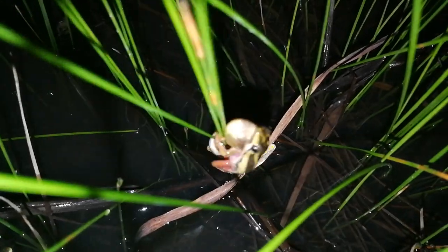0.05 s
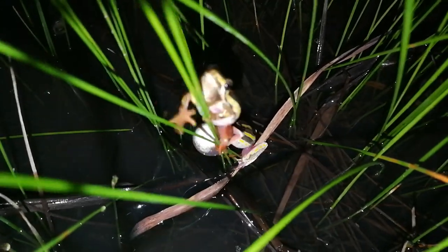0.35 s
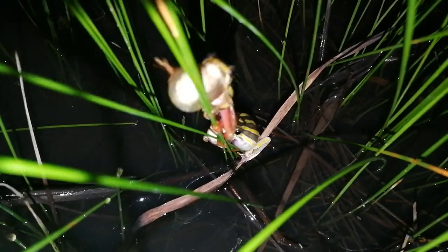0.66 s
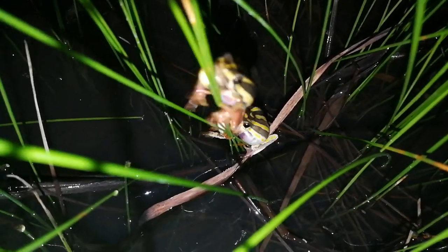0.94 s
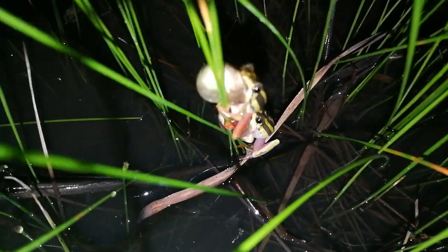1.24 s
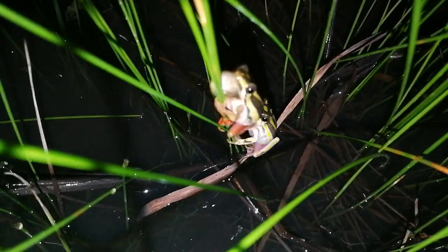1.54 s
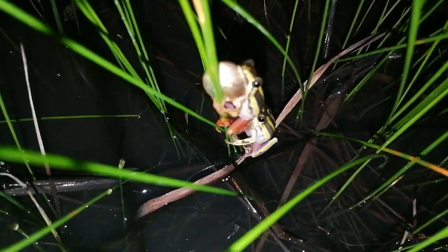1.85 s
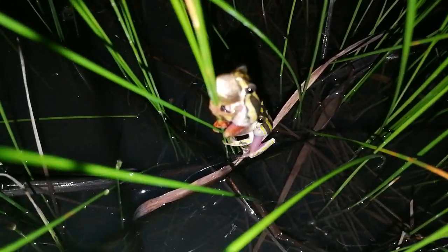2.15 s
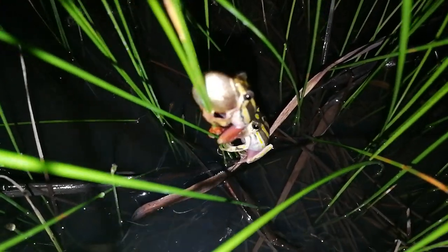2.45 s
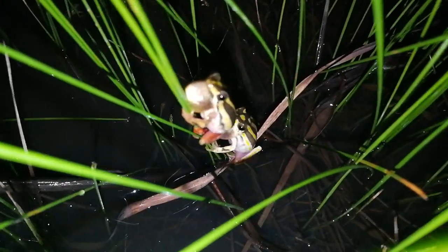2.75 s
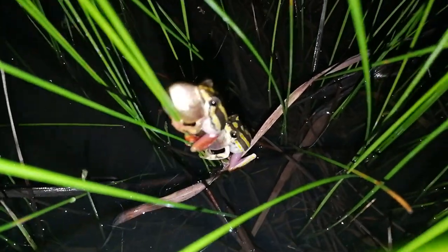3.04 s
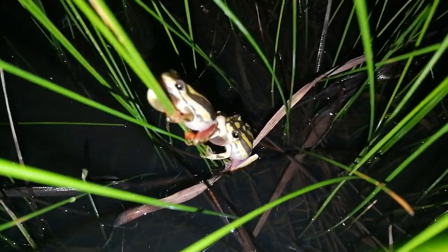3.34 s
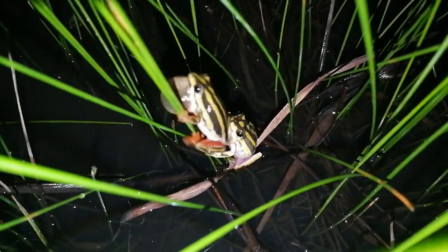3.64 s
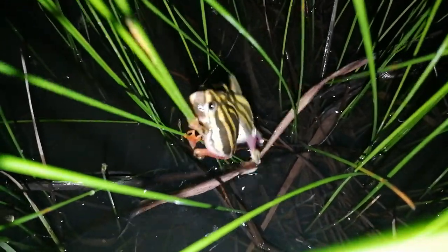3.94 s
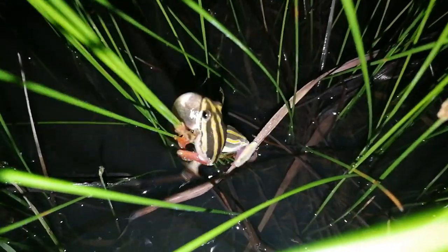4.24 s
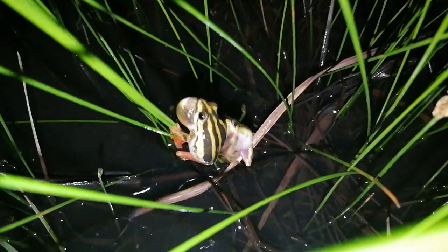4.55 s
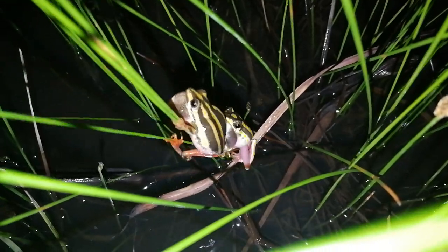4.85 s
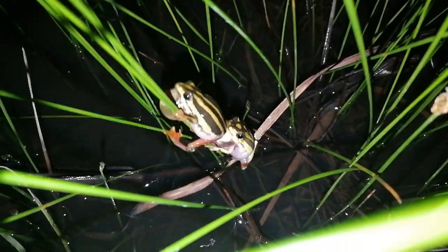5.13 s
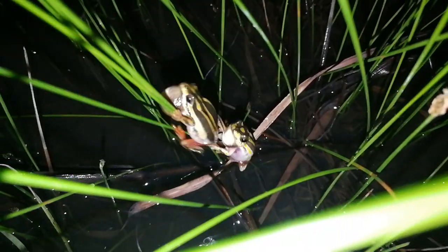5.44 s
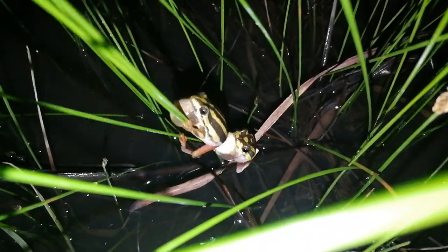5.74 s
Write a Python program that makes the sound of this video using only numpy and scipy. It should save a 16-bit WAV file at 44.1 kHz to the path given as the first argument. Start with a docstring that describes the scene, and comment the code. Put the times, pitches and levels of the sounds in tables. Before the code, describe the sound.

Two reed frogs call loudly at a night pond, about an arm's length away and slightly to the right. Each call is a shrill, raspy chirp about a quarter of a second long that rises in pitch and ends in a tiny rattle. The slightly deeper, rougher frog calls at 0.1, 1.9, 4.8 and 5.7 seconds, the higher one at 0.5, 1.6, 2.3, 3.6, 5.1 and 5.8. They overlap around 1.1, 3.0 and 4.2 seconds.

Smaller frogs make quick runs of sharp, high clicks on both sides. These are faint at first, clear at about 2.1 and 2.6 seconds, then loud and frequent from 3.4 seconds to the end. Throughout, a quiet distant frog chorus blends with very faint cricket trills and a soft low rumble of air. Far-off clicking swells in gentle waves, and faint distant calls come near 0.8 and 3.9 seconds.

```python
"""Two male reed frogs squabble on a stem over a pond at night, an arm's length away, trading short calls.
Each call is a train of pulses from the voice box that rings the vocal sac; the sac tightens, so the
pitch rises. Smaller frogs click among the reeds. Behind them a far chorus, crickets and a faint
trill carry on, and the air rumbles softly."""
import sys
import numpy as np
from scipy import signal
from scipy.fft import rfft, irfft, next_fast_len
from scipy.io import wavfile
from scipy.ndimage import uniform_filter1d

SR = 44100
rng = np.random.default_rng(int(sys.argv[2]) if len(sys.argv) > 2 else 0)


def put_to_file(sound):
    """Save the sound as 16-bit audio at rate SR, in the file named by the first command-line argument."""
    columns = np.atleast_2d(sound).T  # one column per channel
    safe = np.clip(columns, -1, 1)
    whole_steps = np.round(safe * 32767)
    wavfile.write(sys.argv[1], SR, whole_steps.astype(np.int16))


N = 259749
TIME = np.arange(N) / SR

# Tone colour of the rumbling air and of the far chorus: pitch_hz, gain_db
RUMBLE_COLOUR = [(12, -34), (20, -4), (76, 3.5), (184, -5), (338, -21.5), (420, -34.5), (550, -46.5),
                 (920, -120)]
CHORUS_COLOUR = [(300, -31.5), (1000, -31), (1500, -30), (1900, -21.5), (2300, 4), (2800, -17.5),
                 (3500, -26), (5600, -36), (6500, -28), (7600, -31.5), (9000, -36), (11000, -44.5),
                 (15000, -52.5)]
# How the rumble swells and fades: time_s, level_db
RUMBLE_LEVELS = [(0.0, -60.5), (0.92, -51), (1.15, -58.5), (2.15, -66.5), (2.85, -59), (3.17, -67),
                 (3.46, -57), (4.25, -61), (5.51, -55), (5.89, -62)]
# When the faint trill sounds: start_s, end_s
TRILL_TIMES = [(.68, .875), (2.57, 2.8), (4.48, 4.72)]
# Waves of far clicking: crest_s, level_db
CLICK_WAVES = [(0.97, -53.5), (1.9, -51.5), (2.75, -49), (3.6, -44.5), (4.15, -50), (5.0, -43), (5.35, -59),
               (5.87, -42.5)]
# Reed frogs farther off: start_s, length_s, first_hz, last_hz, level_db
FAR_CALLS = [(0.75, 0.094, 2370, 3000, -44.5), (0.827, 0.24, 2590, 3050, -66),
             (3.889, 0.061, 2370, 2870, -44.5), (3.929, 0.068, 2550, 2700, -48.5)]
# Runs of single and of double clicks (pan_db is how much louder the left side is):
# pitch_hz, pan_db, first_db, last_db, click_times_s
SINGLE_CLICK_RUNS = [(4115, 12, -39, -39, (0.919, 0.9622)), (4150, -4, -21, -19, (2.0966, 2.1779, 2.2379)),
                     (4080, 11, -24.5, -24.5, (2.2514,)),
                     (4050, 6, -39, -37, (2.5456, 2.6768, 2.7437, 2.7949)),
                     (4155, -8, -17.5, -16, (3.474, 3.5358, 3.6098, 3.681)),
                     (4100, 5.5, -40, -38, (4.545, 4.6087)),
                     (4135, -5.5, -16, -18.5, (4.6851, 4.7528, 4.827, 4.9014, 4.9731, 5.0277)),
                     (4105, -4, -17.5, -18, (5.7512, 5.8192))]
DOUBLE_CLICK_RUNS = [(4500, 4, -43, -34, (1.5609, 1.6202)), (4330, 11, -20, -18.5, (2.5805, 2.6311)),
                     (4375, 7.5, -33, -32, (2.8614, 2.9266)),
                     (4485, 6, -15.5, -17, (3.4056, 3.4594, 3.5179)),
                     (4440, 6.5, -35.5, -15.5, (3.917, 3.9781, 4.0434, 4.1131, 4.2624, 4.3211, 4.3849, 4.4437)),
                     (4465, 9, -17.5, -14.5, (5.223, 5.2858, 5.3479, 5.4144, 5.4727)),
                     (4650, -3, -32, -27.5, (5.1936, 5.4455, 5.517))]
# How the two males' sound reaches the left and right sides: pitch_hz, pan_db, left_lead_radians
NEAR_PATH = [(500, 7.5, 1.5), (1480, 6.5, 0.5), (1716, -3, 0.33), (1901, 2.5, 2), (1977, -8, -0.3),
             (2340, -7.5, -2.25), (2423, -4, 2.14), (2430, -17, -1.5), (2710, -10, -2), (2980, -9.5, -1.67),
             (3270, -3.5, -2), (5580, -4, -5.5), (7240, -2.5, -4), (8360, 5.5, -2), (14000, 7, -1)]
# Tone colour of each male's rasp: pitch_hz, gain_db
DEEP_RASP = [(300, -12), (800, -13.5), (1400, -0.5), (3000, -6.5), (4300, -1.5), (5500, 5), (7500, -1),
             (9300, 3.5), (10200, -9.5), (11300, -35.5), (13700, -16), (15500, -35.5)]
HIGH_RASP = [(300, -15), (700, -13.5), (1400, -3), (3300, 12.5), (4300, 0.5), (6000, 7.5), (8000, 2.5),
             (10300, 0), (11100, -12), (12000, -32), (13500, -14), (15500, -39.5)]
# Calls of the deeper and the higher male (steepest_at and roughness run from 0 to 1):
# start_s, length_s, attack_s, rattle_s, pulses_per_s, first_hz, last_hz, steepest_at,
# ring_hz, voice_db, swell_db, rasp_db, roughness
DEEP_CALLS = [(0.085, 0.268, 0.0071, 0.11, 366, 2101, 2801, 0.34, 8450, -18.5, 6.5, -47.5, 0.27),
              (1.1, 0.31, 0.0026, 0.059, 380, 2150, 2683, 0.5, 8700, -21, 6.5, -44, 0.3),
              (1.942, 0.22, 0.0021, 0.07, 340, 2214, 2734, 0.38, 8400, -17, 3.5, -42, 0.29),
              (2.987, 0.21, 0.004, 0.063, 298, 2195, 2780, 0.35, 9230, -18.5, 4, -42.5, 0.22),
              (4.18, 0.234, 0.013, 0.064, 290, 2199, 2334, 0.55, 9300, -21.5, -3, -45.5, 0.24),
              (4.757, 0.22, 0.058, 0.021, 293, 2093, 2862, 0.88, 10150, -19.5, 1, -44.5, 0.12),
              (5.688, 0.21, 0.045, 0.02, 214, 2071, 2270, 0.29, 6400, -20.5, 2, -42.5, 0.15)]
HIGH_CALLS = [(0.518, 0.205, 0.015, 0.035, 472, 2389, 2985, 0.25, 9400, -19.5, 3, -40.5, 0.08),
              (1.083, 0.207, 0.016, 0.03, 504.4, 2407, 2976, 0.43, 9250, -19.5, 2.5, -45, 0.1),
              (1.628, 0.21, 0.043, 0.066, 500.5, 2290, 2853, 0.29, 9740, -17, 2.5, -42.5, 0.049),
              (2.25, 0.21, 0.055, 0.041, 440.2, 2470, 2898, 0.52, 10200, -18.5, 3, -43.5, 0.067),
              (2.927, 0.21, 0.083, 0.038, 399.7, 2366, 2873, 0.47, 9500, -21.5, 0.5, -40.5, 0.092),
              (3.592, 0.18, 0.027, 0.045, 589, 2240, 2950, 0.27, 8800, -20, 2.5, -38.5, 0.14),
              (4.18, 0.2, 0.025, 0.041, 492.6, 2321, 2946, 0.46, 9800, -20.5, 2, -42.5, 0.1),
              (5.113, 0.085, 0.0087, 0.1, 454, 2285, 2456, 0.45, 8800, -19, -3, -46.5, 0.061),
              (5.165, 0.12, 0.072, 0.023, 369.7, 2397, 2680, 0.57, 10200, -18.5, 1.5, -41.5, 0.2),
              (5.795, 0.13, 0.0084, 0.02, 449.5, 2340, 2645, 0.14, 9300, -19, 0, -46, 0.13)]
# The deeper male's sac goes slack once in mid call: time_s, pitch_share, gain_db
SLACK_SAC = [(4.343, 1, 4), (4.358, 0.79, 0.5), (4.38, 0.49, -12), (4.395, 0.715, -10), (4.44, 0.78, -6)]

# How each male shapes all his calls
DEEP_HABIT = dict(rise_width=0.17, rate_sag=0.25, last_rate=88, attack_db=7, release_db=12,
                  best_hz=2550, best_width_hz=93, rattle_bend=0.8, release_bend=3.6,
                  onset_hz=0, onset_rough=0.06, onset_rasp_db=3.5, onset_slowing=0)
HIGH_HABIT = dict(rise_width=0.17, rate_sag=0.28, last_rate=110, attack_db=11, release_db=22,
                  best_hz=2750, best_width_hz=234, rattle_bend=1.5, release_bend=2.45,
                  onset_hz=193, onset_rough=0.38, onset_rasp_db=6, onset_slowing=0.35)


def from_db(db):
    """Turns decibels into a number to multiply by."""
    return 10 ** (np.asarray(db) / 20)


def rms_one(x):
    """Scales a sound to an average power of 1."""
    return x / np.sqrt(np.mean(x ** 2) + 1e-20)


def panned(x, pan_db):
    """Makes the left side pan_db louder than the right."""
    gains = from_db([[pan_db / 2], [-pan_db / 2]])
    return x * gains / gains.mean()


def on_bins(points, size):
    """Reads a table's columns at every frequency of an FFT."""
    hz, *columns = np.transpose(points)
    log_hz = np.log(np.arange(size // 2 + 1) * SR / size + 1)
    return [np.interp(log_hz, np.log(hz), column) for column in columns]


def coloured(x, colour):
    """Gives a sound a tone colour, with no ringing ahead of it (a minimum-phase filter)."""
    size = 2 * next_fast_len(x.shape[-1] // 2 + 1024)
    cepstrum = irfft(np.log(from_db(on_bins(colour, size)[0])))
    cepstrum[1:size // 2] *= 2
    cepstrum[size // 2 + 1:] = 0
    return irfft(rfft(x, size) * np.exp(rfft(cepstrum)))[..., :x.shape[-1]]


def band(x, low_hz, high_hz, order=2):
    """Keeps what lies between two pitches."""
    sections = signal.butter(order, [low_hz, high_hz], "band", fs=SR, output="sos")
    return signal.sosfilt(sections, x + 1e-18)


def drift(per_s):
    """A random wander, about 1 in size."""
    knots = rng.standard_normal(4096)
    return np.interp(TIME * per_s, np.arange(len(knots)), knots)


def resonance(x, hz, width_hz):
    """Rings at a pitch that may move; a narrower width rings longer."""
    turn = np.exp(2j * np.pi * np.cumsum(hz + np.zeros(x.shape[-1])) / SR)
    decay = np.exp(-np.pi * width_hz / SR)
    return 2 * np.real(turn * signal.lfilter([1 - decay], [1, -decay], x / turn + 1e-18))


def evened(x, size=620):
    """Holds the power near 1 over a few pulses, leaving each pulse its shape."""
    power = np.mean(x ** 2, axis=0)
    slow = uniform_filter1d(uniform_filter1d(power, size), size)
    return x / np.sqrt(np.abs(slow) + power.mean() / 100 + 1e-20)


def air_rumble():
    """Low noise that swells and fades, nearly the same on both sides."""
    middle, side = rms_one(coloured(rng.standard_normal((2, N)), RUMBLE_COLOUR))
    level_db = np.interp(TIME, *np.transpose(RUMBLE_LEVELS)) + 2 * drift(7)
    spread = from_db(-11.5) * band(side, 130, 500, order=1) * [[1], [-1]]
    return from_db(level_db) * (middle + spread)


def far_chorus():
    """Many far calls blend into one flickering band of noise."""
    level_db = -49 + 0.52 * drift(37)
    return from_db(level_db) * rms_one(coloured(rng.standard_normal((2, N)), CHORUS_COLOUR))


def far_clicks(per_s=260, width_hz=170, rise_db_per_s=85, fall_db_per_s=40.5, lull_db=-71.5):
    """Far clicking frogs set each other off in waves that build quickly and ebb slowly."""
    waves = [db - np.maximum(rise_db_per_s * (crest_s - TIME), fall_db_per_s * (TIME - crest_s))
             for crest_s, db in CLICK_WAVES]
    level_db = np.maximum(np.max(waves, axis=0), lull_db) + 1.3 * drift(40)
    out = np.zeros((2, N))
    for hz in np.linspace(4080, 4560, num=6):
        clicks = (rng.random((2, N)) < per_s / SR) * rng.standard_normal((2, N))
        out += band(clicks, hz - width_hz / 2, hz + width_hz / 2, order=3)
    return from_db(level_db) * rms_one(out)


def trill(hz, sweep_hz, per_s, sharpness, blur):
    """Short, quickly repeated tones, each sliding down, blurred by the distance."""
    beat = (per_s * TIME + 0.092 * drift(9.3)) % 1
    throb = np.abs(np.sin(np.pi * beat)) ** sharpness
    pitch_hz = hz + sweep_hz * (.5 - beat) + 60 * drift(220)
    tone = np.sin(2 * np.pi * np.cumsum(pitch_hz) / SR)
    scatter = rms_one(band(rng.standard_normal((2, N)), hz - 150, hz + 150))
    return rms_one(throb * (tone + blur * scatter))


def crickets():
    """One high trill never stops; a lower one joins in three times."""
    high = trill(6953, sweep_hz=150, per_s=64, sharpness=2.5, blur=1.0)
    low = trill(5500, sweep_hz=900, per_s=84, sharpness=1.4, blur=0.33)
    singing = sum(1. * ((TIME > start) & (TIME < end)) for start, end in TRILL_TIMES)
    return from_db(-71) * high + from_db(-67) * uniform_filter1d(singing, size=900) * low


def far_reed_frogs(per_s=330, width_hz=160):
    """From across the pond, pulses ring a sac whose pitch rises."""
    out = np.zeros((2, N))
    for start, length, first_hz, last_hz, level_db in FAR_CALLS:
        span = (TIME >= start) & (TIME < start + length)
        progress = (TIME[span] - start) / length
        pulses = np.diff(np.floor(TIME[span] * per_s), prepend=np.floor(start * per_s))
        strength = 1 + .5 * rng.standard_normal((2, N))[:, span]
        sac = resonance(pulses * strength, first_hz + (last_hz - first_hz) * progress, width_hz)
        out[:, span] += from_db(level_db) * np.sin(np.pi * progress) * rms_one(band(sac, 2100, 2560))
    return out


def among_reeds(x, early_db, early_fade_s, late_db, late_fade_s):
    """Adds quick echoes from the stems and a faint tail from the banks."""
    t = np.arange(SR // 2) / SR
    scatter, tail = rng.standard_normal((2, 2, len(t))) * (t > .002)
    early = from_db(early_db) * rms_one(scatter * from_db(-60 * t / early_fade_s))
    late = from_db(late_db) * rms_one(tail * from_db(-60 * t / late_fade_s))
    return x + signal.fftconvolve(x, (early + late) / np.sqrt(len(t)), axes=1)[:, :N]


def clicks_of(runs):
    """Through a run a frog keeps its place and rough pitch while its strength changes steadily."""
    clicks = []
    for hz, pan_db, first_db, last_db, times in runs:
        for start in times:
            level_db = np.interp(start, [times[0], times[-1]], [first_db, last_db])
            level_db += 0.58 * rng.standard_normal()
            clicks.append((start, level_db, hz + 70 * rng.standard_normal(), pan_db))
    return clicks


def click_frogs(runs, beats, swell_s, sharpness, chirp, octave_db, snap_db, left_lag_s):
    """A click is a few beats (delay_s, gain_db), each a tiny tone that starts high and settles."""
    out, t = np.zeros((2, N + SR)), np.arange(SR // 30) / SR
    for start, level_db, hz, pan_db in clicks_of(runs):
        click, strain = 0, np.exp(0.1222 * rng.standard_normal())   # no two clicks are quite alike
        for delay_s, beat_db in beats:
            age = np.maximum(t - delay_s * strain - np.array([[left_lag_s], [0]]), 0) / swell_s
            swell = (age * np.exp(1 - age)) ** (sharpness * strain)
            phase = 2 * np.pi * hz * swell_s * (age + chirp * (1 - np.exp(-age)))
            tone = np.sin(phase) + from_db(octave_db) * np.sin(2 * phase)
            noise = band(rng.standard_normal(len(t)), 3000, 13000)
            snap = from_db(snap_db) * np.exp(-age) * (age > 0) * noise
            click = click + from_db(beat_db) * (swell * tone + snap)
        at = round(start * SR)
        out[:, at:at + len(t)] += panned(from_db(level_db) * click, pan_db)
    return out[:, :N]


def near_path(x):
    """Water and reeds reflect the call, so each side gets its own colour and delay."""
    size = 2 * next_fast_len(len(x))
    pan_db, lead = on_bins(NEAR_PATH, size)
    left = from_db(pan_db)
    sides = np.array([left * np.exp(1j * lead), np.ones(len(lead))]) / np.sqrt(1 + left ** 2)
    return irfft(rfft(x, size) * sides)[:, :len(x)]


def off_stems(x, scatter_db=-2, fade_s=0.009):
    """Thin stems scatter only the treble, differently towards each side."""
    t = np.arange(SR // 100) / SR
    echoes = band(rng.standard_normal((2, len(t))), 2200, 14000, order=1) * from_db(-60 * t / fade_s)
    scattered = signal.fftconvolve(x, rms_one(echoes) / np.sqrt(len(t)), axes=1)
    return x + from_db(scatter_db) * scattered[:, :x.shape[1]]


def call_shape(t, call, rise_width, rate_sag, last_rate, attack_db, release_db, best_hz, best_width_hz,
               rattle_bend, release_bend, onset_hz, onset_rough, onset_rasp_db, onset_slowing):
    """A call starts harsh, rises in an S-curve as the sac tightens, and runs down in a rattle."""
    start, length, attack_s, rattle_s, rate, first_hz, last_hz, steepest_at = call[:8]
    voice_db, swell_db, rasp_db, rough = call[9:]
    age = np.minimum(t - start, length)
    harsh = np.exp(-age / 0.025)
    rise = np.tanh((age / length - steepest_at) / (2 * rise_width))
    sac_hz = first_hz + (last_hz - first_hz) * (rise - rise[0]) / (rise[-1] - rise[0])
    opening = np.clip(1 - age / attack_s, 0, 1)
    closing = np.clip(1 - (length - age) / rattle_s, 0, 1)
    # the pulses waver and slow a little, then their gaps stretch into a dry rattle
    rate = rate * (1 - rate_sag * age / length) * np.exp(0.06 * drift(25)[:len(t)])
    slowed = closing ** rattle_bend
    gap_s = (1 - slowed) * (1 + onset_slowing * harsh) / rate + slowed / last_rate
    # a gap lasts a whole number of sac swings, so the pulse rate rises with the sac, then steps down
    swings = np.maximum(np.round(sac_hz * gap_s), 1)
    effort_db = -attack_db * opening - release_db * closing ** release_bend
    # the level changes by up to swell_db as the sac passes its best pitch
    tuned_db = swell_db * np.exp(-((sac_hz - best_hz) / best_width_hz) ** 2)
    return (sac_hz / swings, sac_hz + onset_hz * harsh, voice_db + effort_db + tuned_db,
            rasp_db + effort_db + onset_rasp_db * harsh, rough + onset_rough * harsh)


def voice_box(t, end, rate, sac_hz, rough, lock, jitter=2.2, shimmer_db=7):
    """Uneven pulses; lock (0 to 1) pulls each one into step with the swing of the sac."""
    chance = rng.standard_normal((400, 2))
    beats, swings = np.cumsum(rate) / SR, np.cumsum(sac_hz) / SR
    k = np.arange(int(np.interp(end, t, beats)) + 1)
    unrest = np.interp(k, beats, rough)
    slip = (.012 + jitter * unrest ** 2) * chance[k, 0]   # a calm voice keeps nearly strict time
    gaps = np.diff(np.interp(k + slip, beats, swings), prepend=0)
    pulled = np.cumsum(gaps + lock * (np.round(gaps) - gaps))
    at = np.round(np.interp(pulled, swings, np.arange(len(t)))).astype(int)
    pulses = np.zeros(len(t))
    pulses[at] = from_db(shimmer_db * unrest * chance[k, 1])
    return pulses


def reed_frog(calls, habit, rasp_colour, sac_width_hz, throat_hz, throat_width_hz, throat_db,
              voice_band_hz, ring_db, ring_width_hz, hiss, lock, drive, overtone_db, slack=None):
    """Pulses ring the sac and throat; their sharp edges and the sac's overtones give the rasp."""
    out = np.zeros((2, N))
    for call in calls:
        start, end, ring_hz = call[0], call[0] + call[1], call[8]
        span = (TIME >= start) & (TIME < end + .02)
        t = TIME[span]
        rate, sac_hz, voice_db, rasp_db, rough = call_shape(t, call, **habit)
        ring_hz = ring_hz * (sac_hz / sac_hz.mean()) ** 0.3   # a high ring partly follows the rise
        if slack:
            time_s, pitch_share, gain_db = np.transpose(slack)
            slack_db = np.interp(t, time_s, gain_db, left=0, right=0)
            sac_hz = sac_hz * np.interp(t, time_s, pitch_share, left=1, right=1)
            voice_db, rasp_db = voice_db + slack_db, rasp_db + 2 * slack_db
        # the sac flutters in pitch and strength, more so when the voice is rough
        sac_hz = sac_hz * (1 + (.009 + .06 * rough) * drift(150)[span])
        flutter_db = (1.5 + 1.5 * rough) * drift(130)[span]
        pulses = voice_box(t, end, rate, sac_hz, rough, lock)
        throat = from_db(throat_db) * resonance(pulses, throat_hz, throat_width_hz)
        swing = band(resonance(pulses, sac_hz, sac_width_hz) - throat, *voice_band_hz)
        # the tight skin limits the swing, and the flattened tops make overtones
        swing = np.tanh(drive * evened(swing[None])[0])
        voice = band(swing, *voice_band_hz, order=4)
        overtones = rms_one(band(swing, 4320, 14500, order=4))
        # a puff of air follows each pulse
        airflow = signal.lfilter([1], [1, -np.exp(-1 / (0.0017 * SR))], pulses)
        puffs = airflow * rng.standard_normal(N)[span]
        edges = rms_one(pulses + hiss * puffs) + from_db(overtone_db) * overtones
        ring = from_db(ring_db) * resonance(edges, ring_hz, ring_width_hz)
        rasp = rms_one(coloured(edges + ring, rasp_colour))
        # the harder the sac is driven, the more it rings at five times its pitch
        fifth = rms_one(band(resonance(edges, 5 * sac_hz, 700), 13000, 14900))
        rasp += from_db(-29 + 0.34 * (voice_db + 14.5)) * fifth
        voice = from_db(voice_db - 1) * evened(near_path(voice))
        rasp = from_db(rasp_db + 3.5) * evened(off_stems(near_path(rasp)))
        fade_in = 1 - np.exp(-(t - start) / 0.0005)
        fade_out_db = -3000 * np.maximum(t - end, 0)
        out[:, span] += fade_in * from_db(flutter_db + fade_out_db) * (voice + rasp)
    return out


def scene():
    """The two males in front, the clicking frogs around them and the night behind."""
    deep = reed_frog(DEEP_CALLS, DEEP_HABIT, DEEP_RASP, sac_width_hz=211, voice_band_hz=(1496, 3003),
                     throat_hz=1600, throat_width_hz=327, throat_db=-15.5, ring_db=12, ring_width_hz=680,
                     hiss=0.043, lock=0.5, drive=0.89, overtone_db=-14.5, slack=SLACK_SAC)
    high = reed_frog(HIGH_CALLS, HIGH_HABIT, HIGH_RASP, sac_width_hz=164, voice_band_hz=(1500, 3274),
                     throat_hz=1677, throat_width_hz=470, throat_db=-35.5, ring_db=4.5,
                     ring_width_hz=910, hiss=0.1, lock=0, drive=0.71, overtone_db=-10.5)
    single = click_frogs(SINGLE_CLICK_RUNS, [(0, 3.5), (.005, -15)], swell_s=0.0015,
                         sharpness=1.8, chirp=0.0051, octave_db=-33, snap_db=-39, left_lag_s=44e-6)
    double = click_frogs(DOUBLE_CLICK_RUNS, [(0, 2.5), (.003, 1.5), (.007, -7)], swell_s=0.00096,
                         sharpness=2.26, chirp=0.053, octave_db=-30.5, snap_db=-35.5, left_lag_s=78e-6)
    males = among_reeds(deep + high, early_db=-12, early_fade_s=0.029, late_db=-40, late_fade_s=0.29)
    clicks = among_reeds(single + double, early_db=-28, early_fade_s=.09, late_db=-15, late_fade_s=0.32)
    night = far_chorus() + panned(far_clicks() + crickets(), pan_db=3) + air_rumble() + far_reed_frogs()
    return night + clicks + males


def record(dry, cutoff_hz=15750):
    """Cuts the very highest treble steeply."""
    return signal.sosfilt(signal.ellip(10, .1, 90, cutoff_hz, fs=SR, output="sos"), dry)


dry = scene()
out = record(dry)
put_to_file(out)
```